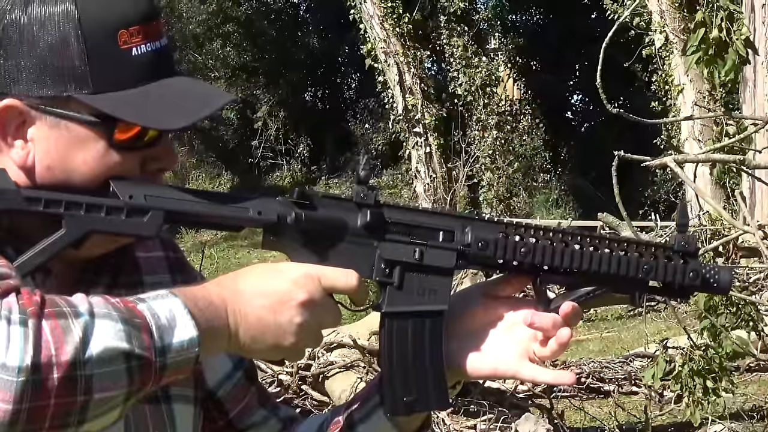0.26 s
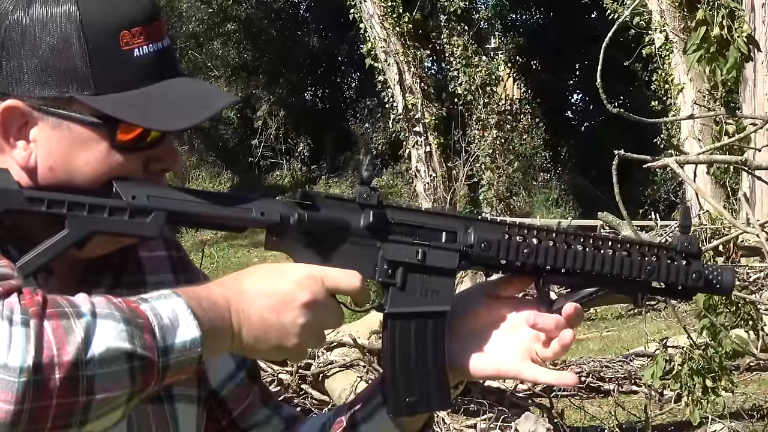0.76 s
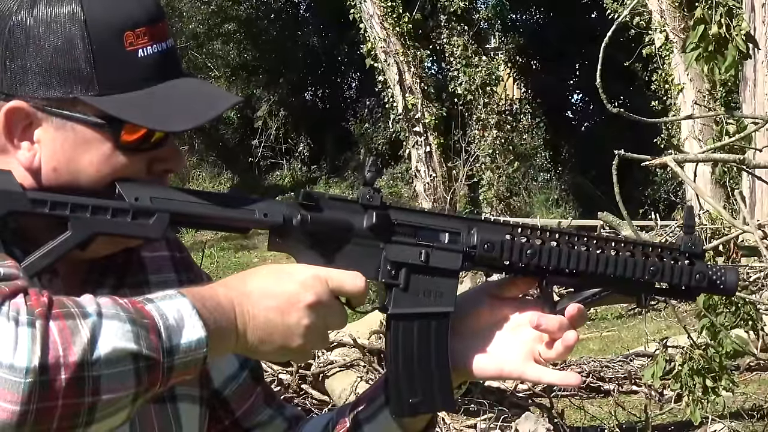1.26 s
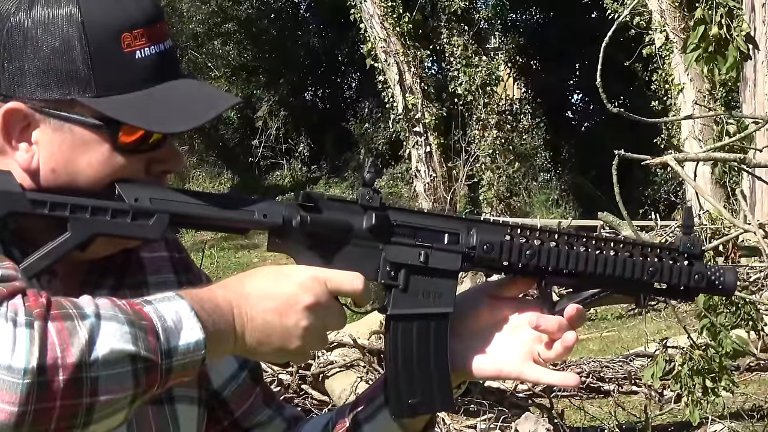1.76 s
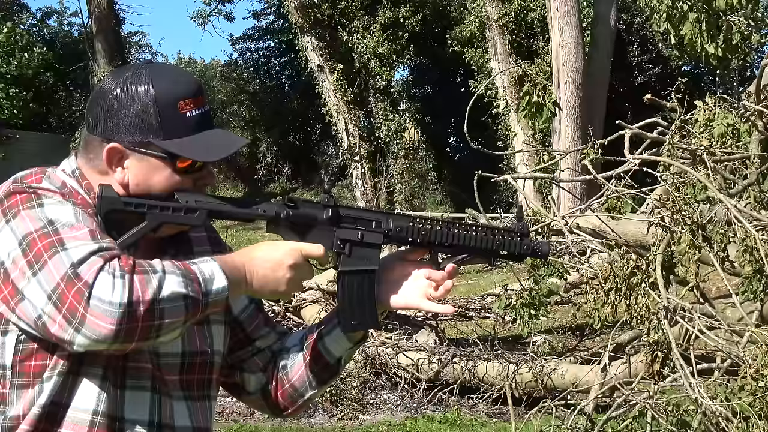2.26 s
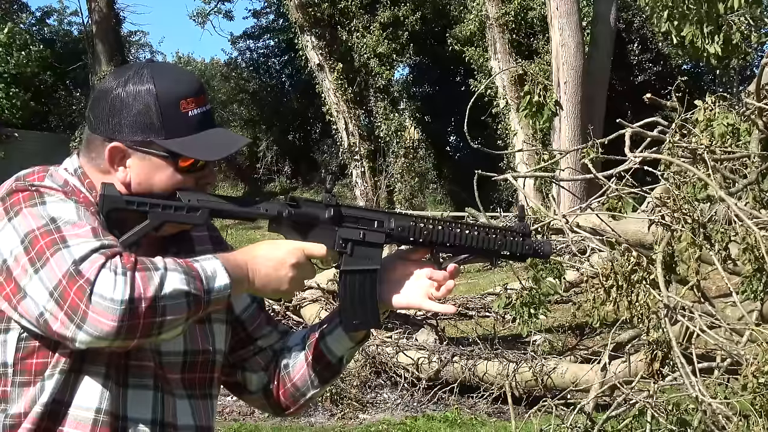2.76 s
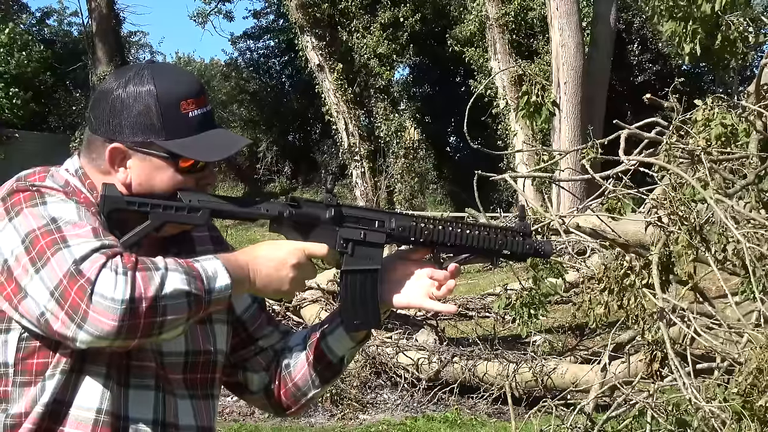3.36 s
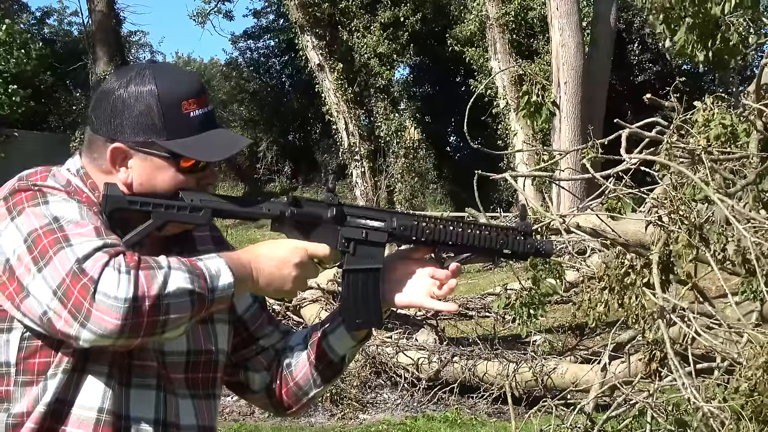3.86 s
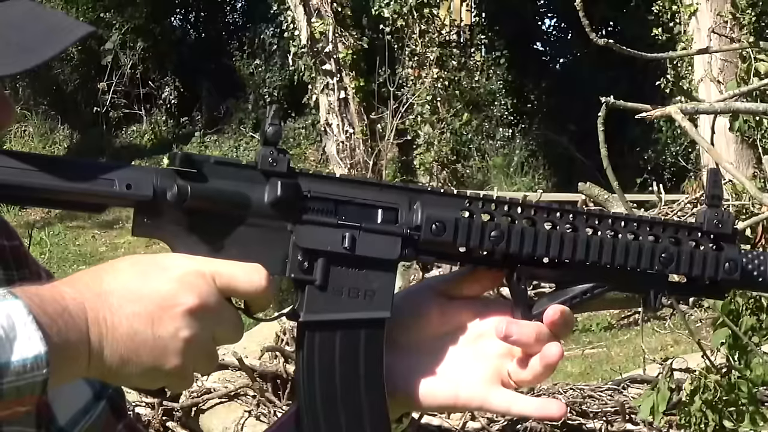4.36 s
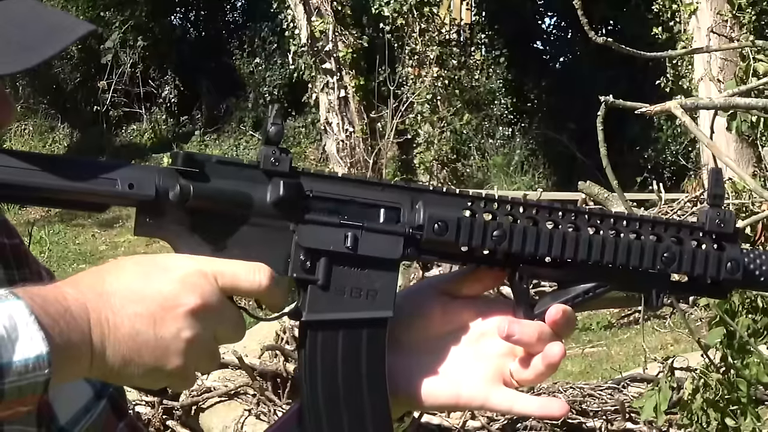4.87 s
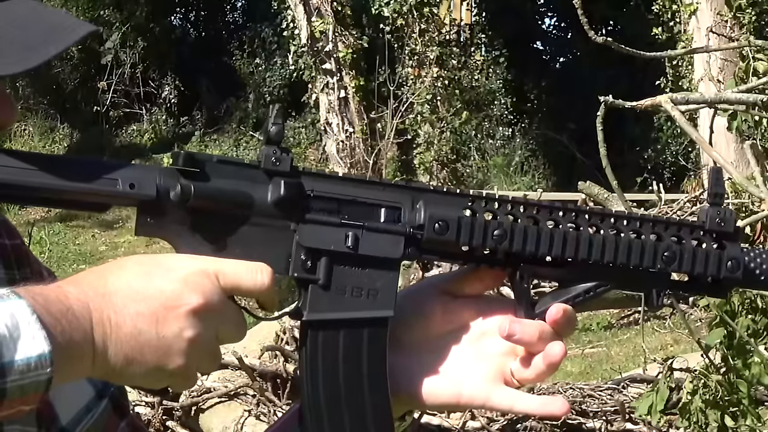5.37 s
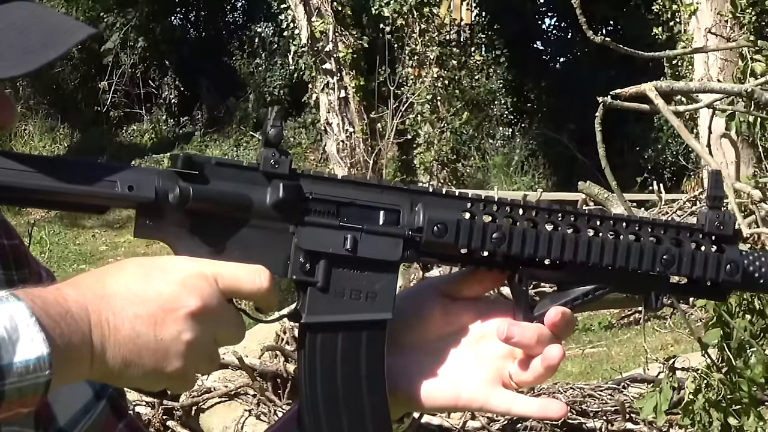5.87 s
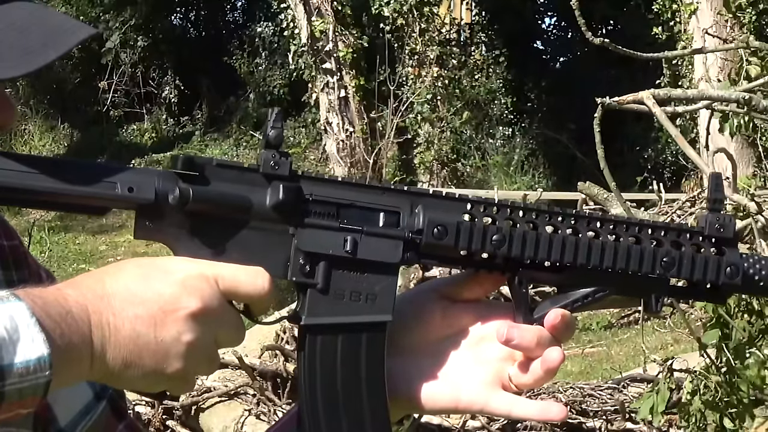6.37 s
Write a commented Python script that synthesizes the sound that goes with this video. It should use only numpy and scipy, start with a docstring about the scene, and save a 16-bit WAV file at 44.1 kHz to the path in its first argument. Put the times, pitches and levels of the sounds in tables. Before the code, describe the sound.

Close, rapid semi-automatic air rifle shots crack and clack in an uneven string, with a light echo from surrounding trees.

```python
"""A CO2 blowback air rifle fires twenty quick shots, close up, at the edge of a wood.
Each shot is one mechanical cycle: trigger ticks, sear, striker, gas blast, the bolt flying back,
slamming shut and bouncing, then the trigger resetting. The blows set the metal ringing and the
loudest ones clip. Pellets knock down range; trees answer over still air and a far engine's hum."""
import sys
import numpy as np
from scipy import signal
from scipy.fft import rfft, irfft
from scipy.io import wavfile
from scipy.ndimage import map_coordinates

SR = 44100
rng = np.random.default_rng(int(sys.argv[2]) if len(sys.argv) > 2 else 0)


def transcribe(signal):
    """Save signal, clipped to [-1, 1], as a 16-bit WAV file at the path in sys.argv[1]."""
    frames = np.atleast_2d(signal).T
    limited = np.clip(frames, -1, 1)
    pcm = np.round(limited * 32767).astype(np.int16)
    wavfile.write(sys.argv[1], SR, pcm)


N = 292383
T = np.arange(SR // 4) / SR  # s since a blow
STRIKER_LEAD_S = .0166  # the striker lands this long before the blast
BOUNCE_DB, BOUNCE_SHARE = -10.5, .325  # the bolt's bounce: level, flight as a share of the bolt's cycle
RESET_DB = -19  # base level of the trigger's release

# Cue list, one row a shot: blast t/s, trigger pull/s, bolt cycle/s, trigger held after the blast/s
SHOTS = [(.0958, .15, .0355, .197), (.6816, .104, .0365, .177), (.9992, .06, .0372, .127),
         (1.3284, .065, .0374, .141), (1.7326, .056, .0382, .146), (2.1115, .064, .0388, .143),
         (2.4502, .053, .0399, .13), (2.7142, .05, .0411, .107), (2.9479, .047, .042, .111),
         (3.2922, .055, .0422, .125), (3.5967, .057, .0433, .118), (3.9654, .052, .043, .143),
         (4.507, .084, .044, .17), (4.8074, .051, .0452, .128), (5.0747, .047, .0444, .131),
         (5.3233, .046, .0446, .119), (5.5695, .05, .044, .122), (5.8411, .051, .0433, .141),
         (6.1537, .054, .043, .15), (6.5044, .052, .0429, .15)]
# EQ of the gas jet: f/Hz, relative level/dB
GAS_EQ = [(100, 2.5), (400, -4.5), (700, 5), (1300, -1), (2000, -5), (2800, -10), (4100, -2.5), (7000, 0),
          (8700, -6), (10300, -1), (12300, -2), (13500, -8), (16000, -14)]
def gas_blast():
    """The blast cracks and booms out of the muzzle; the rest of the charge hisses from the open action."""
    jet, boom = np.zeros(N), np.zeros(N)
    for s, *_ in SHOTS:
        pitch = np.exp(.03 * rng.standard_normal(3))
        add(jet, s, burst(0, hold=.0014, t60=.0058))  # crack
        add(jet, s + .003, burst(-22, hold=.015, t60=.17))  # hiss
        add(boom, s + .00021, -swing(3.4, hz=370 * pitch[0], t60=.0062))
        add(boom, s + .00088, -swing(-2.9, hz=505 * pitch[1], t60=.014))
        add(boom, s + .015, swing(-25, hz=850 * pitch[2], t60=.025))
    return coloured(jet, GAS_EQ) + boom


# As the cartridge cools, the bolt tends to hit its rear stop later and softer: t/s, delay/s, level/dB
REAR_STOP = [(0, 0.016, -2.5), (1.4, 0.018, -1), (2.7, .0193, -3), (3.9, 0.026, -5), (4.5, .022, -19),
             (6.6, 0.022, -8)]
def cycles():
    """Per shot: the blast's time, the leads and delays of the parts around it (s), and two levels (dB)."""
    times, delays, levels = np.transpose(REAR_STOP)
    for s, pull, shut, _ in SHOTS:
        sear, feed = .0094 + .32 * pull, .0186 + .11 * pull  # leads grow with a slow pull
        striker_db = -4 + 2.5 * np.exp(-s / .96)  # the first shots hit harder
        stop, stop_db = np.interp(s, times, delays), np.interp(s, times, levels)
        yield s, sear, feed, striker_db, stop, stop_db, shut


# EQ of the heavy metal hits, full and bright: f/Hz, relative level/dB
SLAM_EQ = [(60, -7), (300, -0.5), (700, -2.5), (1100, -1.5), (1900, -3.5), (2700, -8.5), (3800, -2.5),
           (5000, -2), (6200, -6), (7100, 4.5), (8700, -3.5), (10000, 3), (12300, -2), (14000, -9)]
def heavy_blows():
    """The striker hits the valve; the bolt hits its rear stop and slams shut."""
    track = np.zeros(N)
    for s, _, _, striker_db, stop, stop_db, shut in cycles():
        slam_db = np.interp(shut, [.036, .044], [-4, 1])  # a slow cycle ends in a firmer slam
        add(track, s - STRIKER_LEAD_S, burst(striker_db - .5, hold=.00043, t60=.016))
        add(track, s + stop, burst(stop_db - 1.5, hold=.0013 * amp(stop_db), t60=.013))
        add(track, s + shut, burst(slam_db, hold=.00077, t60=.016))
    return coloured(track, SLAM_EQ)


# EQ of the small parts' crisp clicks: f/Hz, relative level/dB
CLICK_EQ = [(100, -2), (600, -11.5), (1100, 1.5), (1800, -2), (2700, -11.5), (4000, 2), (5100, -2.5),
            (7300, 5), (8800, 0.5), (10000, 5), (12200, -1), (13500, -4.5), (16000, -21)]
def light_blows():
    """Sear and feed click ahead of the shot; small parts rattle, and the bolt bounces once."""
    track = np.zeros(N)
    for s, sear, feed, _, stop, stop_db, shut in cycles():
        add(track, s - sear - .004, burst(-26, hold=.0015, t60=.009))
        add(track, s - sear, burst(-14.5, hold=.00095, t60=.0019))
        add(track, s - feed - .004, burst(-26.5, hold=.002, t60=.008))
        add(track, s - feed, burst(-13, hold=.0024, t60=.0073))
        add(track, s - .0115, burst(-26, hold=.0028, t60=.035))
        add(track, s - .0085, burst(-18, hold=.001, t60=.086))
        add(track, s + .0052, burst(-15.5, hold=.00059, t60=.0093))  # the valve closes
        add(track, s + .016, burst(-21.5, hold=.001, t60=.012))  # the bolt cocks the striker
        add(track, s + stop + .0074, burst(stop_db - 18.5, hold=.0017, t60=.015))
        bounce = shut * (1 + BOUNCE_SHARE)
        add(track, s + bounce, burst(BOUNCE_DB + rng.normal(0, .83), hold=.00083, t60=.028))
    return coloured(track, CLICK_EQ)


def rattle(db, count=4):
    """Loose parts chatter at random while the bolt travels."""
    track = np.zeros(N)
    for s, _, shut, _ in SHOTS:
        for share, size_db in zip(rng.random(count), rng.normal(0, 4.2, count)):
            add(track, s + .008 + share * shut, burst(db + size_db, hold=.00022, t60=.0078))
    return coloured(track, CLICK_EQ)


# The rifle's metallic ring, one row a mode: f/Hz, relative level/dB, t60/s
RIFLE_MODES = [(977, -6.5, 0.44), (1720, -10.5, .22), (3300, -10.5, 0.16), (3950, -28.5, 2.9),
               (5860, -7, .25), (7200, -3, 0.09), (7600, -9.5, .09), (8300, -5.5, 0.4), (10400, 6, .06),
               (10400, 2.5, .06), (12000, 7, .11), (14350, -7.5, 0.07), (15450, -1, .1)]
def ringing(blows, blur=.0006):
    """The rifle's modes, driven by the blows; shifting parts blur the high ones most."""
    t = np.arange(SR // 2) / SR
    fades = [(hz, amp(db - 60 * t / t60)) for hz, db, t60 in RIFLE_MODES]

    def modes():
        drifting_t = t + blur * np.cumsum(rng.standard_normal(len(t))) / np.sqrt(SR)
        return sum(fade * np.sin(2 * np.pi * hz * drifting_t) for hz, fade in fades)
    return amp(-59) * per_shot(blows, modes)


def pings():
    """The struck valve pin sings briefly; the bolt sets the receiver ringing and pings when it bounces."""
    track = np.zeros(N)
    for s, _, _, striker_db, stop, stop_db, shut in cycles():
        pin, bolt, spring, detune = rng.standard_normal(4)  # shot-to-shot variation
        bounce = shut * (1 + BOUNCE_SHARE)
        add(track, s - STRIKER_LEAD_S, swing(striker_db - 17 + 2 * pin, hz=6985 + 35 * detune, t60=.13))
        add(track, s + stop, swing(stop_db / 4 - 23, hz=982, t60=.18))
        add(track, s + shut, swing(-36 + 3 * spring, hz=3330, t60=.17))
        add(track, s + bounce, swing(BOUNCE_DB - 5 + 2 * bolt, hz=5870 + 60 * detune, t60=.035))
    return track


def thumps():
    """Each heavy movement shoves the whole rifle: low, well-damped pushes of air."""
    track = np.zeros(N)
    for s, _, feed, _, stop, stop_db, shut in cycles():
        vary_db = rng.normal(0, .85, 3)
        thud_db = np.interp(shut, [.04, .043], [-13, 0])  # a late bolt lands with a deeper thud
        add(track, s - feed, swing(vary_db[0] - 20, hz=32.6, t60=.089))
        add(track, s + .0078, swing(vary_db[1] - 24, hz=98, t60=.089))
        add(track, s + stop, swing(stop_db - 20, hz=169, t60=.035))
        add(track, s + stop, swing(stop_db - 23, hz=58, t60=.26))  # a hard stop leaves the stock shaking
        add(track, s + shut + .00038, swing(vary_db[2] + thud_db / 2 - 11, hz=51, t60=.031))
        add(track, s + shut + .0007, -swing(thud_db - 3, hz=229, t60=.0091))
        add(track, s + shut + .022, swing(-30, hz=27, t60=.19))
    for s, _, _, held in SHOTS:
        add(track, s + held, swing(RESET_DB - 8, hz=41.9, t60=.11))
    return track


# Ticks of the trigger linkage: lead before the blast/pull lengths, relative level/dB
LINKAGE_TICKS = [(1.31, -30), (1.18, -33), (1, -24.5)]
# EQ of the trigger's thin ticks: f/Hz, relative level/dB
TICK_EQ = [(200, -29.5), (800, -4.5), (1050, 6), (1700, 4.5), (2900, -4.5), (4000, 0), (5200, -4),
           (7500, 5), (8900, -6.5), (9900, 6.5), (11200, -7), (12600, 0.5), (14000, -17.5), (16000, -22.5)]
def trigger():
    """Ticks on the pull, spread wider by a slow finger; on release a double snap and a faint rebound."""
    ticks = np.zeros(N)
    for s, pull, _, held in SHOTS:
        pull_db = -2.5 - 8 * np.log10(pull / .043)  # a slow pull ticks more softly
        for lead, db in LINKAGE_TICKS:
            onset = s - lead * pull
            if onset > 0:
                add(ticks, onset, burst(pull_db + db + rng.normal(0, .99), hold=.00073, t60=.012))
        add(ticks, s + held, burst(RESET_DB - 7.5, hold=.00063, t60=.011))
        add(ticks, s + held + .0029, burst(RESET_DB - 2, hold=.0012, t60=.015))
        add(ticks, s + held + .0082, burst(RESET_DB - 33, hold=.002, t60=.02))
    return coloured(ticks, TICK_EQ)


def pellet_knocks(delay_s=.127):
    """An eighth of a second after each shot the pellet knocks on something down range."""
    track = np.zeros(N)
    for s, *_ in SHOTS:
        flight, pitch, force = rng.standard_normal(3)
        arrival = s + delay_s + .0017 * flight
        add(track, arrival, swing(-33.5 + 2 * force, hz=750 * np.exp(.07 * pitch), t60=.036))
        add(track, arrival, burst(-41 + 3 * force, hold=.0017, t60=.016))
    return track


# EQ of the early reflections: f/Hz, relative level/dB
SCATTER_EQ = [(100, -6), (500, -1), (1300, 0.5), (2700, 1), (4200, -7), (7800, -4.5), (9000, -1),
              (10200, -6), (12000, 0), (16000, -10)]
def near_scatter(rifle):
    """The close surroundings throw back a short, tight tail."""
    return amp(-20) * echoes(rifle, SCATTER_EQ, t60=.11, rise=.0042)


# EQ of the wood's tail, light in the bass: f/Hz, relative level/dB
TREES_EQ = [(100, -18), (600, 0), (1400, 5.5), (2800, 1.5), (4000, 3.5), (8200, 1), (11000, -7.5),
            (16000, -10.5)]
def tree_echo(rifle):
    """The trees answer with a slower, fainter wash."""
    return amp(-36.5) * echoes(rifle, TREES_EQ, t60=.69, rise=.015)


# EQ of the outdoor bed, mostly rumble: f/Hz, relative level/dB
AIR_EQ = [(15, -58.5), (25, -24.5), (43, -5.5), (70, 0.5), (108, -2.5), (212, -11), (285, -10), (416, -7),
          (531, -14.5), (659, -15.5), (2990, -43), (4030, -32.5), (4610, -38.5), (8360, -39.5),
          (16000, -73)]
def outdoor_air():
    """Still air, barely wavering in level, with a faint low buffeting."""
    level = amp(-46.5 + .48 * wobble(1.2))
    bed = unit(coloured(rng.standard_normal(N), AIR_EQ))
    buffet = amp(-48.5) * wobble(63)
    return level * bed + buffet


# Partials of the engine's hum: f/Hz, level/dB before the swell
ENGINE_PARTIALS = [(112, -50.5), (283, -52), (335, -65), (390, -60.5), (434, -54.5)]
# Fader ride on the hum: t/s, level/dB
ENGINE_SWELL = [(0, -2.5), (.45, 1), (.9, -7), (2, -2), (3.1, 2.5), (3.8, -4), (4.3, -3), (6.6, -7)]
def far_engine():
    """A distant engine swells and sinks, each partial wavering in level and phase."""
    t = np.arange(N) / SR
    swell_db = np.interp(t, *np.transpose(ENGINE_SWELL))
    hum = np.zeros(N)
    for hz, db in ENGINE_PARTIALS:
        level = amp(db + 1.9 * wobble(3.3))
        hum += level * np.sin(2 * np.pi * hz * t + .81 * wobble(6.2))
    return amp(swell_db) * hum


def burst(db, hold, t60):
    """Noise of a contact or a jet: full strength for hold seconds, then dying."""
    return amp(db - 60 * np.maximum(T - hold, 0) / t60) * rng.standard_normal(len(T))


def swing(db, hz, t60):
    """One damped sine, falling 60 dB in t60 seconds."""
    return amp(db - 60 * T / t60) * np.sin(2 * np.pi * hz * T)


def echoes(x, eq, t60, rise):
    """A diffuse reverb tail that swells and dies away."""
    t = np.arange(SR // 2) / SR
    fade = amp(-60 * t / t60) * (1 - np.exp(-t / rise))
    fade /= np.linalg.norm(fade)
    return coloured(per_shot(x, lambda: fade * rng.standard_normal(len(t))), eq)


def per_shot(x, response):
    """Convolve x with a response that is drawn anew for each shot, as the rifle shifts in the hands."""
    cuts = [0] + [int((s - .08) * SR) for s, *_ in SHOTS[1:]] + [N]
    track = np.zeros(N)
    for start, end in zip(cuts, cuts[1:]):
        add(track, start / SR, signal.fftconvolve(x[start:end], response()))
    return track


def coloured(x, eq, size=4096):
    """x through a causal filter of unit energy, shaped by the EQ curve."""
    hz, db = np.transpose(eq)
    log_bins = np.log(np.fft.rfftfreq(size, 1 / SR) + 1)
    gain = amp(np.interp(log_bins, np.log(hz), db))
    cepstrum = irfft(np.log(unit(gain)))
    cepstrum[1:size // 2] *= 2  # minimum phase keeps the attacks sharp
    cepstrum[size // 2 + 1:] = 0
    impulse = irfft(np.exp(rfft(cepstrum)))
    return signal.fftconvolve(x, impulse)[:len(x)]


def wobble(rate):
    """A smooth random curve, rate knots a second."""
    knots = rng.standard_normal(int(N * rate / SR) + 4)
    return map_coordinates(knots, [np.arange(N) * rate / SR])


def add(track, s, sound):
    """Mix a sound into the track at s seconds."""
    start = int(np.clip(round(s * SR), 0, N))
    track[start:start + len(sound)] += sound[:N - start]


def amp(db):
    """Decibels to gain."""
    return 10 ** (np.asarray(db) / 20)


def unit(x):
    """x at rms 1."""
    return x / np.sqrt(np.mean(x ** 2) + 1e-20)


def scene():
    """Mono mix: the rifle up front, its two reverb tails, the pellets and the outdoor bed."""
    blows = heavy_blows() + light_blows() + rattle(db=-14.5)
    rifle = blows + ringing(blows) + pings() + gas_blast() + trigger()
    tails = near_scatter(rifle) + tree_echo(rifle)
    return (rifle + tails + thumps() + pellet_knocks() + outdoor_air() + far_engine())[None]


def record(dry):
    """The loudest blows clip at full scale; a low-pass then cuts the treble above 16 kHz."""
    clipped = np.clip(dry, -1, 1)
    lowpass = signal.firwin(161, 16000, fs=SR)
    return signal.fftconvolve(clipped, lowpass[None], mode="same")


dry = scene()
out = record(dry)
transcribe(out)
```